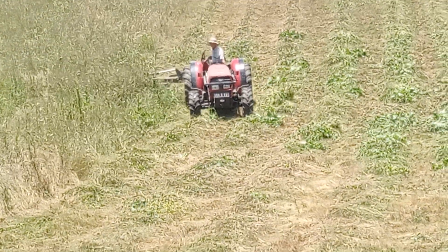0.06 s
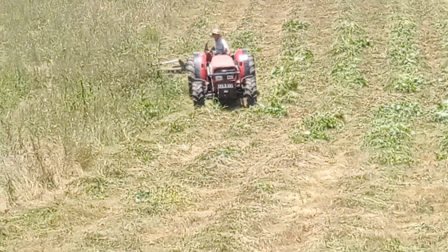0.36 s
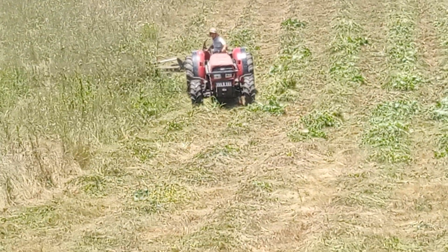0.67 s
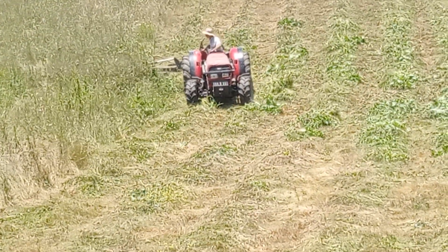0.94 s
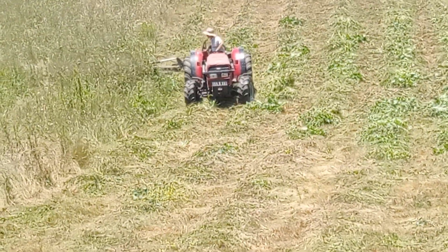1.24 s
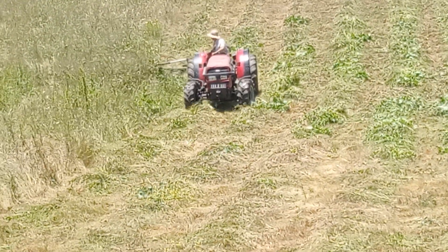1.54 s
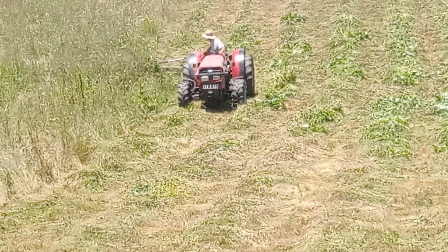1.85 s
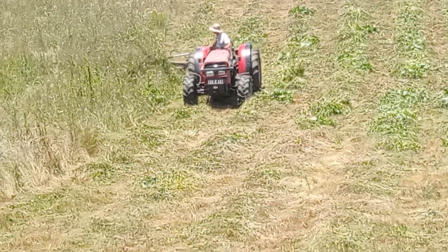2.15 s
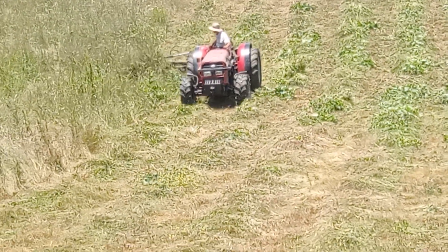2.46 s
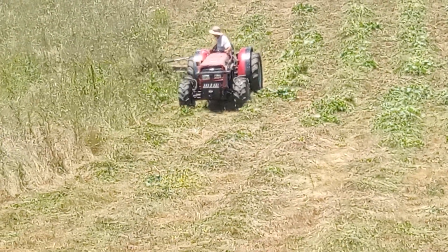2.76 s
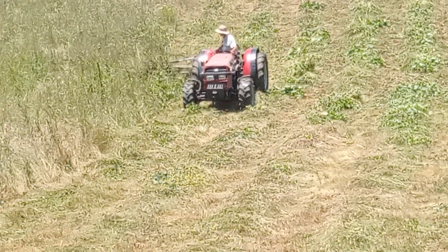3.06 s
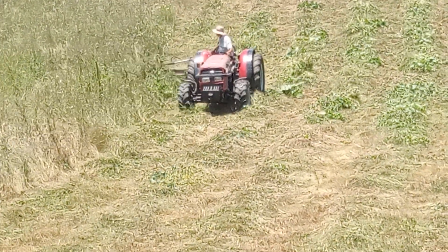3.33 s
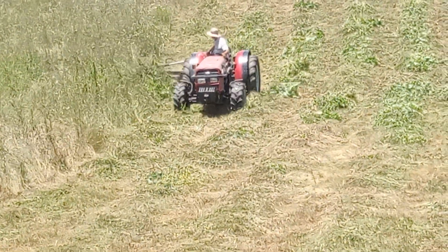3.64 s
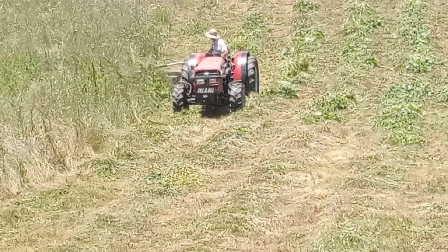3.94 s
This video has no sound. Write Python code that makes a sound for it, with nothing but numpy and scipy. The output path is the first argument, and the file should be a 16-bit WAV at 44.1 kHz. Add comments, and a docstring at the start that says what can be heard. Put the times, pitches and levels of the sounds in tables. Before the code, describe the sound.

A small diesel tractor drones along as its mower slashes through thickening grass.

```python
"""In a field, a small three-cylinder diesel tractor creeps along with a belt-driven drum mower at its side.
The spinning blades slash through ever thicker grass, now and then knocking on a tough stalk.
The engine hums and clatters as it fires, and the mower's sheet-metal cover drones in surges.
Behind them the frame rattles, the gears whine under load, and dry straw hisses and crackles."""
import sys
import numpy as np
from scipy import signal
from scipy.fft import rfft, irfft
from scipy.io import wavfile
from scipy.ndimage import uniform_filter1d

SR = 44100
rng = np.random.default_rng(int(sys.argv[2]) if len(sys.argv) > 2 else 0)


def waveform_to_disk(signal):
    """Save audio, clipped to [-1, 1], as 16-bit WAV at the path in sys.argv[1]."""
    frames = np.transpose(np.atleast_2d(signal))
    scaled = np.clip(frames, -1, 1) * 32767
    samples = np.round(scaled).astype(np.int16)
    wavfile.write(sys.argv[1], SR, samples)


N = 4 * SR
STALKS_PER_S = 900


# tone of the slashing: (frequency [Hz], level [dB])
SLASH_TONE = [(300, -30.5), (1000, -13.5), (1350, -10.5), (1620, -8.5), (2330, -5.5), (2600, -1), (3230, 2),
              (3800, -7.5), (4150, -13), (4400, -16.5), (5000, -35), (6000, -51), (12000, -90)]
# the slashing grows as the grass thickens: (time [s], level [dB])
SLASH_LOUDNESS = [(0.0, -35.5), (0.15, -36.5), (0.28, -33.5), (0.51, -37), (1.02, -30.5), (1.23, -32.5),
                  (1.28, -29), (1.7, -28.5), (1.75, -30.5), (1.94, -27), (1.98, -30), (2.06, -26),
                  (2.2, -29.5), (2.49, -28), (2.64, -25.5), (2.78, -23.5), (3.0, -22), (3.02, -25),
                  (3.15, -25.5), (3.17, -22.5), (3.21, -27), (3.29, -24), (3.33, -26.5), (3.42, -25),
                  (3.49, -28.5), (3.81, -29), (3.95, -27)]
# the blades ring as they cut: (pitch [Hz], width [Hz], level [dB])
BLADE_NOTES = [(3240, 110, -11.5), (3414, 69, -15.5), (3760, 130, -11.5)]

def slashing(cutting, sweep):
    """The blades slash through the grass, and the snapping stalks make them ring."""
    ring = 0
    for hz, width, db in BLADE_NOTES:
        hits = colour(snaps(STALKS_PER_S * sweep, spread_db=0.5), SLASH_TONE)
        ring += from_db(db) * rms_one(resonate(hits, hz, width))
    slash = even(colour(cutting, SLASH_TONE) + ring, samples=4400)
    return from_db(-0.53) * loudness(SLASH_LOUDNESS) * slash


# a blade hits a tough stalk: (time [s], peak level [dB], pitch [Hz])
STALK_HITS = [(1.009, -20, 3200), (1.338, -23, 3190), (1.622, -18, 3390), (2.023, -12.5, 3250),
              (2.049, -16, 3100), (2.057, -12.5, 3300), (2.08, -15, 3080), (2.091, -24, 3300),
              (2.564, -13.5, 3350), (2.679, -14, 3300), (2.764, -14, 3100), (2.807, -16, 3225),
              (3.160, -7.5, 2850), (3.243, -12.5, 3100), (3.28, -11.5, 3098), (3.303, -13.5, 3200),
              (3.382, -17, 2950), (3.549, -16, 3130), (3.885, -18, 3000), (3.934, -13, 3070)]
# how the struck blade rings: (multiple of the hit's pitch [x], width [Hz], level [dB])
KNOCK_NOTES = [(.715, 310, -0.5), (.924, 450, -11), (1, 230, 6.5)]

def knocks(contact_s=0.001):
    """Each tough stalk scrapes the blade for an instant and rings it for a few milliseconds."""
    out = np.zeros(N + SR)
    t = np.arange(1024) / SR
    soften = signal.butter(10, 3700, fs=SR, output="sos")
    for s, peak_db, pitch_hz in STALK_HITS:
        scrape = rng.standard_normal(len(t)) * np.exp(-t / contact_s)
        ring = sum((-1) ** k * from_db(db) * resonate(scrape, ratio * pitch_hz, width)
                   for k, (ratio, width, db) in enumerate(KNOCK_NOTES))
        ring = signal.sosfilt(soften, ring)
        start = int(s * SR)
        out[start:start + len(ring)] += from_db(peak_db) * ring / np.abs(ring).max()
    return out[:N]


# dense tufts of grass: (time [s], length [s], level [dB])
TUFT_CUTS = [(1.435, 0.032, -34), (2.412, .052, -26.5), (2.785, 0.041, -28.5)]
# tone of their rasp: (frequency [Hz], level [dB])
RASP_TONE = [(1000, -23), (2100, 0.5), (3700, -0.5), (4400, -14), (5100, -28), (9000, -58)]

def tufts(sweep):
    """A dense tuft rasps briefly through the blades."""
    return bursts(TUFT_CUTS) * colour(noise(np.sqrt(sweep)), RASP_TONE)


# the engine block and bonnet ring: (pitch [Hz], width [Hz], level [dB])
BLOCK_NOTES = [(433.3, 30.5, -4), (492.5, 55, -1), (558.4, 18.6, -3), (621, 15, -7.5), (791, 34, -2.5)]
# how loudly they clatter: (time [s], level [dB])
CLATTER_LOUDNESS = [(0.0, -33.5), (0.12, -38), (0.3, -34), (0.38, -43), (0.48, -34), (0.56, -40),
                    (0.75, -39), (1.01, -36), (1.33, -38.5), (1.44, -34), (1.5, -38), (3.01, -38),
                    (3.13, -41), (3.95, -38.5)]
# a growl that swells midway: (time [s], level [dB])
GROWL_LOUDNESS = [(0, -63), (1.2, -49), (1.65, -40), (2.5, -39.5), (3, -47.5), (4, -47)]
# the engine's hum: (multiple of the crankshaft speed [x], level [dB])
ENGINE_NOTES = [(2, -56.5), (3, -55), (5, -63.5), (7, -68)]
# tone of the machine's rumble: (frequency [Hz], level [dB])
RUMBLE_TONE = [(20, -32), (42, -16.5), (62, 1), (130, 5), (230, 5), (350, 3), (600, 0.5), (1200, 4),
               (2500, -13), (5000, -53.5)]
# how loudly it rumbles: (time [s], level [dB])
RUMBLE_LOUDNESS = [(0, -46), (1.3, -44), (1.4, -43), (1.6, -44.5), (2.65, -44.5), (2.9, -43.5), (3.1, -45),
                   (3.7, -41.5), (4, -43.5)]

def engine(turns):
    """Three firings in two turns shake the block, over a growl, a hum and a rumble."""
    firing = strokes(turns * 3 / 2, sharpness=0.23, spread_db=2.5)
    block = rattle(firing, BLOCK_NOTES, band_hz=[385, 3400], steepness=5)
    clatter = loudness(CLATTER_LOUDNESS) * even(block, samples=7000)
    growl = loudness(GROWL_LOUDNESS) * drone(firing, hz=673, width_hz=340)
    hum = sum(from_db(db) * shaft_note(turns, multiple) for multiple, db in ENGINE_NOTES)
    rumble = loudness(RUMBLE_LOUDNESS) * colour(noise(), RUMBLE_TONE)
    return clatter + growl + hum + rumble


# the mower's cover rings: (pitch [Hz], width [Hz], level [dB])
COVER_NOTES = [(827.5, 82, -4), (878, 73, 0.5)]
# its drone swells: (time [s], level [dB], pitch [Hz])
COVER_SURGES = [(0.12, -40, 854), (0.271, -33.5, 845), (0.443, -35, 850), (0.49, -38, 837),
                (0.694, -32, 871), (0.766, -35, 876), (1.132, -41, 852), (1.23, -37.5, 865),
                (1.36, -33.5, 860), (1.445, -33.5, 866), (1.53, -37.5, 827), (1.615, -31, 864),
                (1.775, -37.5, 823), (1.89, -35, 872), (2.111, -33, 871), (2.216, -37, 868),
                (2.414, -36.5, 841), (2.55, -35, 851), (2.651, -38.5, 851), (2.824, -32.5, 859),
                (2.89, -36.5, 870), (3.068, -36.5, 843), (3.269, -39, 884), (3.805, -36.5, 843)]

def cover(turns, surge_s=0.016, waver_hz=16):
    """The shaken sheet metal drones and sings out several times a second, at slightly varying pitch."""
    shake = strokes(turns, sharpness=0.12, spread_db=3)
    steady = sum(from_db(db) * drone(shake, hz, width) for hz, width, db in COVER_NOTES)
    pitch = in_time(COVER_SURGES)[1] + waver_hz * waver(rate_hz=25)
    sing = np.sqrt(2) * np.sin(2 * np.pi * np.cumsum(pitch) / SR)
    t = np.arange(N) / SR
    power = sum(from_db(db) ** 2 * np.exp(-((t - s) / surge_s) ** 2) for s, db, _ in COVER_SURGES)
    return from_db(-39) * even(steady, samples=2200) + from_db(2.2) * np.sqrt(power) * sing


# the mower's frame rings: (pitch [Hz], width [Hz], level [dB])
FRAME_NOTES = [(1116, 52, -6.5), (1220, 210, -2), (1399, 60, -3), (1712, 27, -7.5), (2024, 100, -4),
               (2480, 150, -0.5)]
# how loudly it rattles: (time [s], level [dB])
FRAME_LOUDNESS = [(0.0, -36.5), (0.66, -34.5), (0.78, -33), (1.33, -34), (2.03, -35.5), (2.35, -38.5),
                  (2.44, -30), (2.49, -40.5), (3.29, -30.5), (3.72, -35.5), (3.95, -32)]
# one panel rings on its own, most in light grass: (time [s], level [dB])
PANEL_LOUDNESS = [(0, -48), (0.33, -37.5), (0.55, -44), (1.4, -36), (2.25, -45), (4, -47)]

def frame(turns):
    """The spinning drum rattles the mower's frame and one of its panels."""
    shake = strokes(turns, sharpness=0.048, spread_db=2)
    ring = rms_one(rattle(shake, FRAME_NOTES, band_hz=[900, 3800], steepness=8))
    panel = even(drone(shake, hz=2185, width_hz=175), samples=3000)
    return from_db(-1.5) * loudness(FRAME_LOUDNESS) * ring + loudness(PANEL_LOUDNESS) * panel


# the gears get louder under load: (time [s], level [dB])
GEAR_LOUDNESS = [(0, -65), (2.7, -52.5), (3.2, -41.5), (3.7, -44.5), (4, -49)]

def gears(turns, teeth=45):
    """Gear teeth meet many times in each turn of the drum and make a wavering whine."""
    whine = np.sqrt(2) * np.sin(2 * np.pi * teeth * turns + 0.4 * waver(rate_hz=9.9))
    return loudness(GEAR_LOUDNESS) * whine


# tone of the straw's fine hiss: (frequency [Hz], level [dB])
HISS_TONE = [(2500, -13), (5200, 1), (7000, 1), (8500, -2), (10300, -1.5), (12000, -9.5), (13500, -12),
             (15500, -20)]
# hiss and crackle grow in thick grass: (time [s], level [dB])
STRAW_LOUDNESS = [(0.0, -73), (1.26, -76.5), (1.43, -70), (1.55, -72), (1.59, -70), (1.73, -70.5),
                  (2.17, -65), (2.2, -65), (2.46, -64.5), (2.53, -68.5), (2.95, -58.5), (3.19, -64.5),
                  (3.32, -61), (3.5, -66), (3.95, -64.5)]
# tone of single straws splitting: (frequency [Hz], level [dB])
CRACKLE_TONE = [(3500, -23.5), (6000, -1), (10300, 1), (12000, -13.5), (15500, -20)]
# wisps of straw swish away: (time [s], length [s], level [dB])
WISPS = [(1.587, .022, -65), (2.13, 0.043, -64), (3.633, .03, -68)]

def straw(cutting, sweep, crackles_per_s=45, fade_s=0.0012):
    """Dry straw hisses and crackles as the blades pass, and whole wisps swish away."""
    hiss = from_db(0.7) * colour(cutting, HISS_TONE)
    clicks = np.abs(snaps(crackles_per_s * sweep, spread_db=1.5))
    fading = signal.lfilter([1], [1, -np.exp(-1 / (fade_s * SR))], clicks + 1e-18)
    crackle = from_db(-8.5) * colour(noise(fading), CRACKLE_TONE)
    swish = resonate(noise(np.sqrt(sweep)), hz=6700, width_hz=2200)
    return loudness(STRAW_LOUDNESS) * (hiss + crackle) + bursts(WISPS) * colour(swish, HISS_TONE)


# the drum's hum: (multiple of its speed [x], level in light grass [dB], level in thick grass [dB])
DRUM_NOTES = [(2, -64, -71), (3, -70, -60.5), (4, -69.5, -52.5), (6, -73.5, -53)]

def drum_hum(turns):
    """The drum hums harder under load; the straw's level stands for how thick the grass is."""
    straw_db, = in_time(STRAW_LOUDNESS)
    load = (straw_db - straw_db.min()) / np.ptp(straw_db)
    return sum(from_db(light + load * (thick - light)) * shaft_note(turns, multiple)
               for multiple, light, thick in DRUM_NOTES)


def from_db(db):
    """Turn decibels into a volume factor."""
    return 10 ** (np.asarray(db) / 20)


def rms_one(x):
    """Set the average strength (rms) to 1."""
    return x / np.sqrt(np.mean(x ** 2) + 1e-20)


def even(x, samples):
    """Hold the strength near 1 over each stretch of samples."""
    return x / np.sqrt(uniform_filter1d(x ** 2, size=samples) + 1e-12)


def in_time(rows):
    """Join timed points with straight lines, one curve per column."""
    times, *columns = np.transpose(rows)
    return [np.interp(np.arange(N) / SR, times, column) for column in columns]


def loudness(rows):
    """Turn timed decibels into a volume curve."""
    return from_db(in_time(rows)[0])


def bursts(rows, edge_s=0.012):
    """A volume curve of short bursts that start sharply, hold and stop."""
    t = np.arange(N) / SR
    out = np.zeros(N)
    for s, length, db in rows:
        corners = [s, s + edge_s, s + max(length, edge_s), s + length + 2 * edge_s]
        out += from_db(db) * np.interp(t, corners, [0, 1, 1, 0])
    return out


def noise(strength=1):
    """Plain noise that follows a strength."""
    return strength * rng.standard_normal(N)


def colour(x, tone):
    """Shape a sound's lows and highs with a tone table."""
    hz, db = np.transpose(tone)
    bins = np.maximum(np.fft.rfftfreq(N, 1 / SR), 1)
    gain = from_db(np.interp(np.log(bins), np.log(hz), db))
    return rms_one(irfft(rfft(x) * gain, N))


def resonate(x, hz, width_hz):
    """Make a sound ring at one pitch; a smaller width rings longer."""
    r = np.exp(-np.pi * width_hz / SR)
    feedback = [1, -2 * r * np.cos(2 * np.pi * hz / SR), r * r]
    return signal.lfilter(np.sqrt(1 - r) * np.array([1, 0, -1]), feedback, x + 1e-18)


def rattle(shake, notes, band_hz, steepness):
    """Shaken metal rings at several pitches, kept within one band."""
    ring = sum(from_db(db) * resonate(noise(shake), hz, width) for hz, width, db in notes)
    return signal.sosfilt(signal.butter(steepness, band_hz, "band", fs=SR, output="sos"), ring)


def drone(shake, hz, width_hz):
    """Pulsing noise, narrowed twice around one pitch."""
    return rms_one(resonate(resonate(noise(shake), hz, width_hz), hz, width_hz))


def strokes(cycles, sharpness, spread_db):
    """One swell per cycle, each with a strength of its own."""
    strength = from_db(spread_db * rng.standard_normal(1000))
    return rms_one(strength[cycles.astype(int)] * np.exp(-sharpness * np.cos(2 * np.pi * cycles)))


def shaft_note(turns, multiple):
    """A pure note at a multiple of a shaft's speed."""
    return np.sqrt(2) * np.sin(2 * np.pi * (multiple * turns + rng.random()))


def snaps(per_s, spread_db):
    """Random clicks, many small and a few larger."""
    sizes = from_db(spread_db * np.minimum(rng.exponential(1, N), 4)) * rng.choice([-1, 1], N)
    return rms_one(sizes * (rng.random(N) < per_s / SR))


def waver(rate_hz):
    """Slow random movement."""
    return rms_one(signal.sosfilt(signal.butter(2, rate_hz, fs=SR, output="sos"), noise()))


# the engine's crankshaft: (time [s], speed [turns/s])
CRANK_SPEED = [(0, 34.8), (1.45, 34.6), (1.8, 31.6), (2.35, 34.3), (3.1, 33.8), (3.6, 34), (4, 30)]
# the belt-driven drum slows in thick grass: (time [s], speed [turns/s])
DRUM_SPEED = [(0, 28.6), (1.45, 28.2), (1.8, 29.2), (2.35, 29.1), (2.8, 28.6), (3.1, 28.05), (3.75, 27.35),
              (4, 27.2)]

def scene():
    """The turning crankshaft and drum set the rhythm of the engine and the mower."""
    crank, drum = (np.cumsum(in_time(speed)[0]) / SR for speed in (CRANK_SPEED, DRUM_SPEED))
    sweep = strokes(drum * 3, sharpness=0.28, spread_db=1.6)  # three blades pass per turn
    stalks = from_db(-7.5) * snaps(STALKS_PER_S * sweep, spread_db=0.5)
    cutting = stalks + noise(np.sqrt(sweep))
    blades = slashing(cutting, sweep) + knocks() + tufts(sweep)
    machine = engine(crank) + cover(drum) + frame(drum)
    background = gears(drum) + straw(cutting, sweep) + drum_hum(drum)
    return (blades + machine + background)[None]


def record(dry, cutoff_hz=15500):
    """Cut off the highest treble steeply."""
    return signal.sosfilt(signal.ellip(10, .1, 80, cutoff_hz, fs=SR, output="sos"), dry)


dry = scene()
out = record(dry)
waveform_to_disk(out)
```